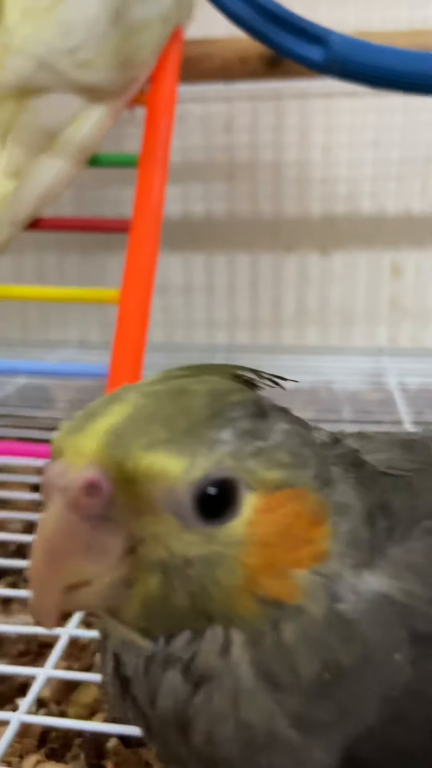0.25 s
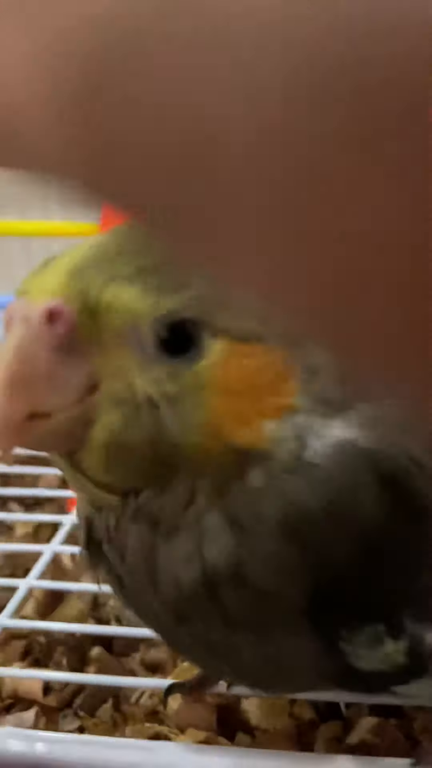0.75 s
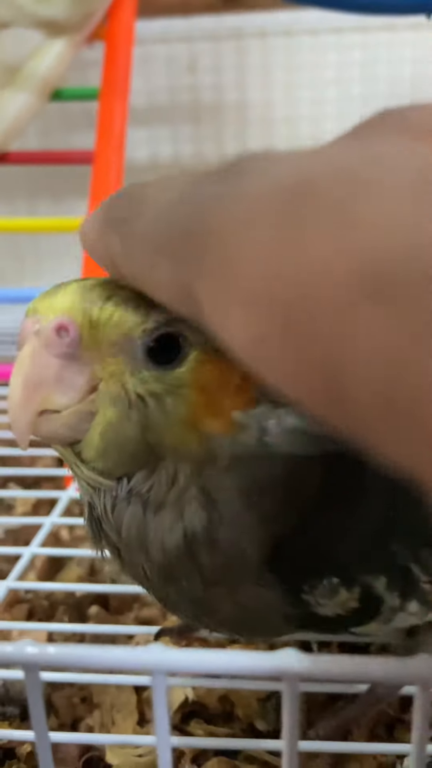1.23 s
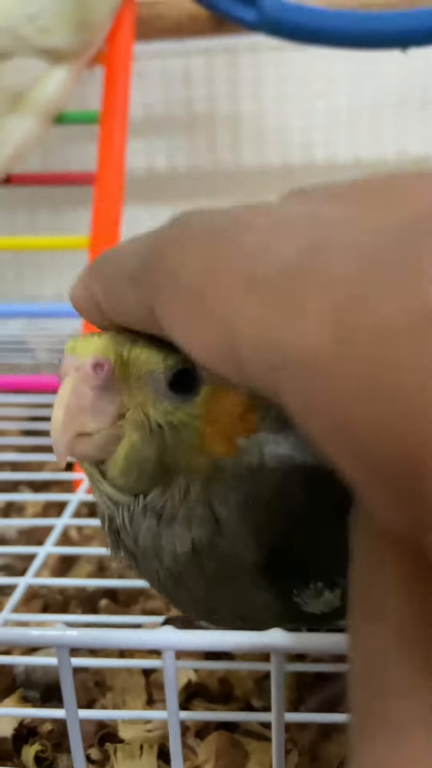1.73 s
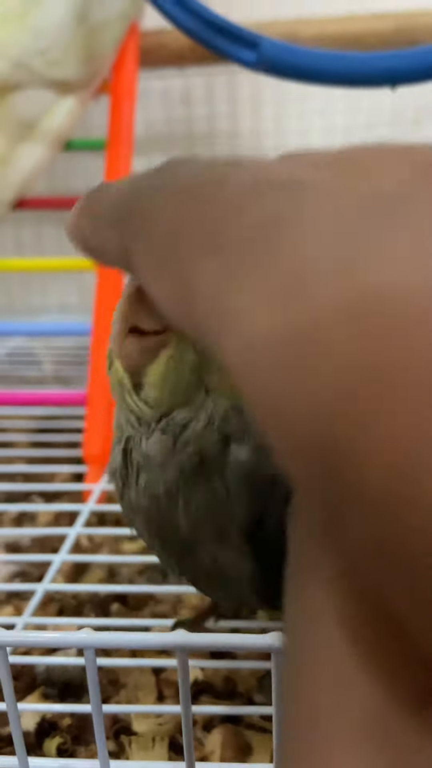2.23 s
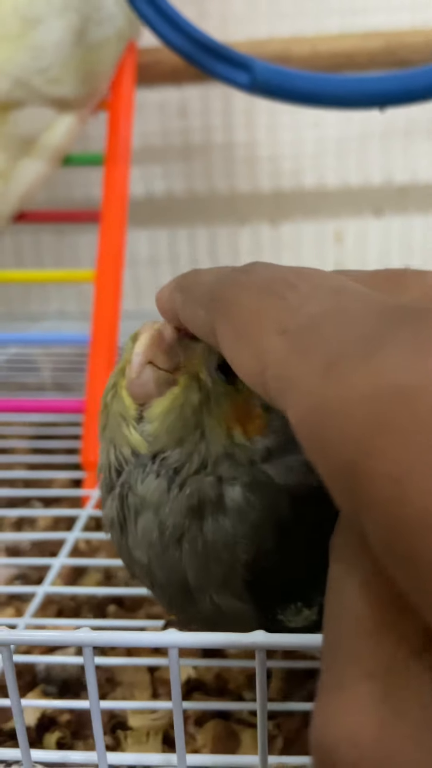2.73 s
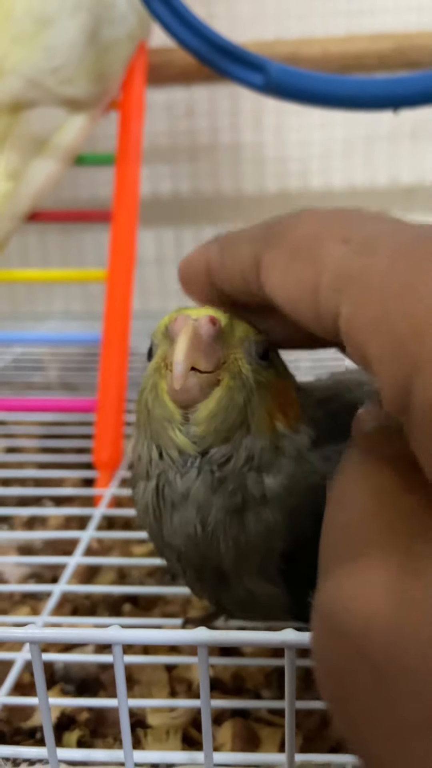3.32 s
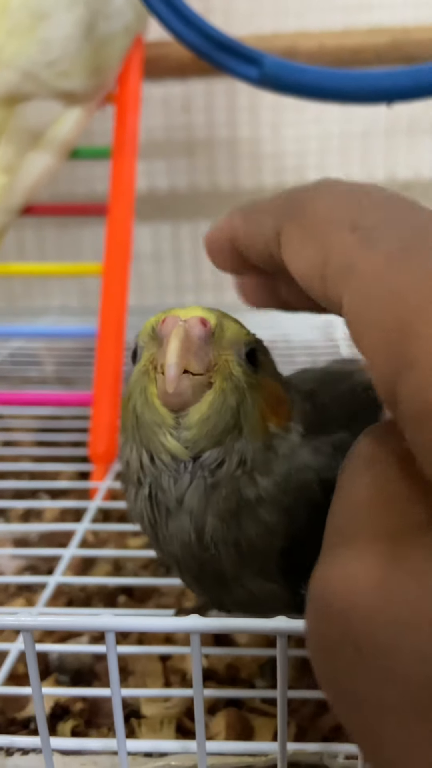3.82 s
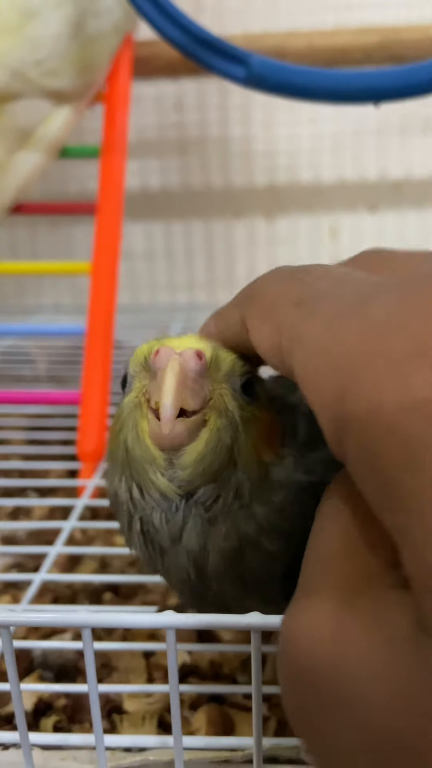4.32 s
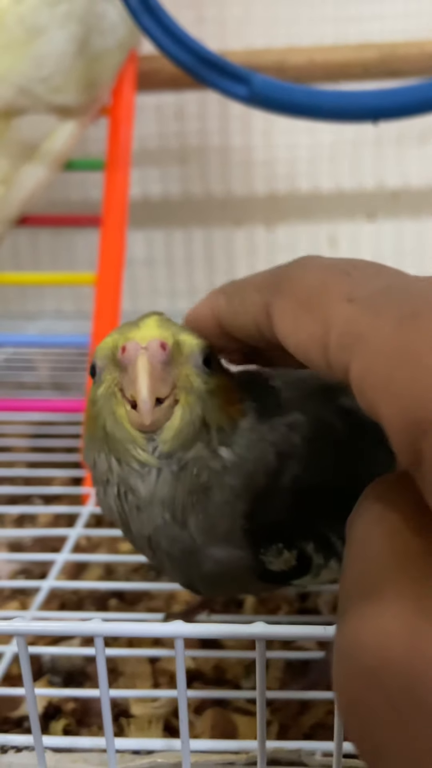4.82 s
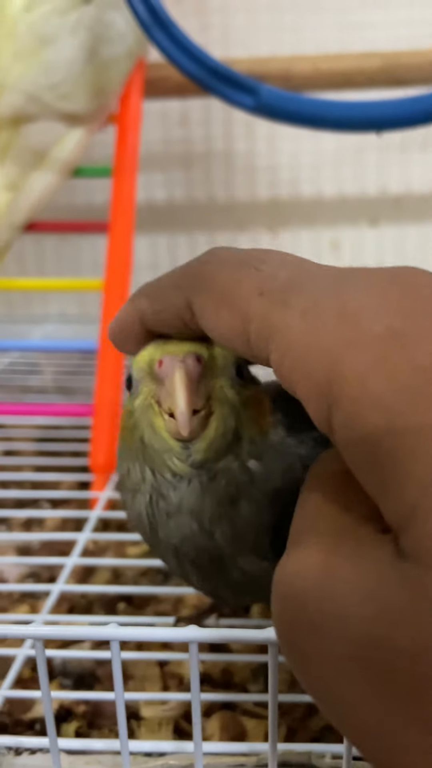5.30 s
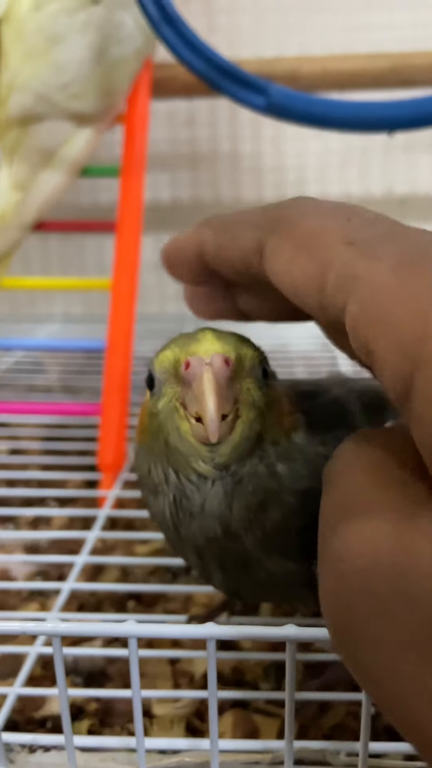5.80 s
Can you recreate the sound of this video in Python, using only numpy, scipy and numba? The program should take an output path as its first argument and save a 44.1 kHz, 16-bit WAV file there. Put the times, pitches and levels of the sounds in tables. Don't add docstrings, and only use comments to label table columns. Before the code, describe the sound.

A young cockatiel close to a phone microphone gives a short raspy hiss ending in a hard push and squeak, then clicks and weak little puffs with thin whistles. A longer hiss swells around two seconds, a quiet gap follows, then short puffs, a sharp squeak and a final hiss that grows loud and open. Low motor rumble and faint fan hum fill the small room.

```python
import sys
import numpy as np
from scipy import signal
from scipy.fft import rfft, irfft
from scipy.io import wavfile
from scipy.ndimage import uniform_filter1d
from numba import njit

SR = 44100
rng = np.random.default_rng(int(sys.argv[2]) if len(sys.argv) > 2 else 0)


def ratio_of_db(decibels):
    return 10 ** (np.asarray(decibels, float) / 20)


def to_wav(s):
    ch = np.atleast_2d(s).T
    pcm = np.round(np.clip(ch, -1, 1) * 32767)
    wavfile.write(sys.argv[1], SR, pcm.astype(np.int16))


N = 266849
T = np.arange(N) / SR

# f/Hz, density/dB per Hz
ROOM_AIR = [(28, -38), (45, -3.5), (70, -2.5), (150, -6.5), (450, -6.5), (900, -12), (1700, -20.5),
            (2800, -23), (4000, -29), (5100, -35), (6400, -28.5), (7500, -42.5), (11000, -51.5),
            (13500, -43.5), (14800, -62)]
# f/Hz, share/0-1
ROOM_LIKENESS = [(60, 1), (250, 1), (600, 0.35), (1200, 0), (4500, 0.35), (6000, 0), (7200, 0.68)]
# t/s, level/dB
TRAFFIC = [(0, -52.5), (.44, -53), (1.26, -53), (1.5, -50.5), (2.56, -53), (3.6, -52), (4.6, -50.5),
           (5.1, -46.5), (5.45, -52), (5.69, -51), (6.05, -53.5)]
# t/s, level over rest/dB
DRONE_SWELLS = [(0.0, 11.5), (.29, 11), (.83, 7.5), (1.26, 5), (2.17, 1), (3.62, 7), (5.05, 6.5),
                (5.51, 3.5), (6.05, 4)]
# f/Hz, waver/Hz, level/dB
FAN_TONES = [
    (279.5, 7.14, -63),
    (443.1, 3.87, -59),
    (12900, 8, -110),
]
# f/Hz, left lead/rad
PORT_LEAD = [(0, 0), (1900, .4), (3300, 1.), (4700, 0.), (6000, 1.8), (6900, 2.95), (8000, 3.35),
             (9500, 6.05), (11200, 6.5), (12700, 9.25), (14300, 9.7), (15700, 12.6)]
# f/Hz, left minus right/dB
PORT_BALANCE = [(100, 2), (2600, -0.5), (3600, -5), (4600, -10.5), (5500, 1), (16000, 3)]
# t/s, peak/dB, windpipe f/Hz
CLICKS = [(0.6555, -29, 1630), (0.9938, -34, 1600), (1.538, -35, 1870), (3.8056, -29, 1600),
          (3.9806, -43, 1630)]
# t/s, peak/dB, f/Hz, glide/Hz per ms, hold/ms
WHISTLES = [(.376, -35, 4040, -150, 1.2), (.3785, -30.5, 5660, -20, 1), (.3845, -27.5, 2600, -80, 2.3),
            (.4, -57, 2800, -0.5, 47), (.8235, -31, 2235, 53, 2.5), (1.011, -41.5, 1730, 4, 4),
            (1.153, -42, 5080, 51, 4), (1.16, -43, 5370, 1.5, 48), (1.220, -44, 5300, -15, 8.5),
            (1.238, -49, 4700, -48, 5.7), (1.245, -43, 4390, -150, 2), (1.2522, -25.5, 2226, -73.5, 1.75),
            (3.193, -55, 3400, 88, 6.2), (3.2, -41, 4020, 22, 5.8), (3.216, -56, 4040, -7, 18),
            (3.211, -60, 5370, -20, 1), (4.716, -28, 5790, 30, 1.2)]
# t/s, peak/dB, f/Hz, glide/Hz per ms, hold/ms
SQUEAKS = [(.381, -34.5, 2830, -45.5, 4.1), (.671, -51, 3130, 11, 2.3), (2.364, -35, 1960, -10, 1.8),
           (3.188, -55, 3000, 29, 2), (3.586, -24.5, 2341, 71, 2.9), (3.5905, -26.5, 2477, -80, 1.5),
           (3.848, -45.5, 1610, 5, 8.5), (4.717, -30, 2016, 10.5, 1.3)]
OVERTONE_DB = [
    0.5,
    -8,
    -15,
]
# t/s, effort/dB, beak opening/0-1, windpipe share/dB
HISSES = [
    [(0.0, -41.5, 0.14, -1), (0.06, -45, 0.13, -4.5), (0.252, -42.5, 0.05, -4.5), (0.36, -51, 0.23, -17),
     (0.378, -32, .9, -7.5)],
    [(1.484, -56, 0.16, 14.5), (1.55, -49, 0.12, -2.5), (1.724, -46.5, 0.15, -4), (1.914, -39.5, 0.14, 0),
     (2.07, -46, 0.14, -10), (2.128, -41, .1, -0.5), (2.145, -36.5, 0.07, -1.5), (2.212, -33.5, 0.11, -5.5),
     (2.368, -45, 0.28, -2.5)],
    [(3.836, -49, 0.08, -2), (3.862, -46, 0.19, -5.5), (4.082, -42.5, 0.5, -8), (4.3, -37.5, .7, -2.5),
     (4.452, -32, 1, -4.5), (4.5, -32.5, 0.9, 0), (4.52, -33.5, 1, -1), (4.66, -29.5, 1, -4.5),
     (4.719, -33.5, 1, -3)],
]
# start t/s, end t/s, effort/dB, windpipe share at start/dB, closing push/dB
PUFFS = [(0.676, 0.821, -50, 0, 9), (1.01, 1.088, -51.5, -1, 6.5), (1.11, 1.155, -47, -25, -8),
         (1.207, 1.258, -51.5, -25, 0.1), (3.229, 3.293, -51.5, -23, 2), (3.339, 3.585, -44.5, -10, 14)]
# t/s, length/ms
CATCHES = [(0.0135, 3.5), (0.0594, 5.5), (0.0698, 4), (0.0908, 10), (0.2948, 4), (0.3043, 3.5),
           (0.3163, 6.5), (0.3495, 6), (0.3602, 6), (0.7149, 4), (0.7268, 6.5), (0.8072, 6), (1.0222, 4.5),
           (1.0282, 6.5), (1.0666, 7.5), (1.519, 3.5), (1.5405, 5), (1.9446, 3), (1.996, 3), (3.3768, 12),
           (3.4936, 7), (3.942, 6), (3.975, 3), (3.982, 11), (4.0099, 6), (4.4813, 3), (4.4863, 8),
           (4.4973, 8), (4.6484, 6)]

ROOM_AIR_DB, DRONE_DB, SWELL_S = -48.5, -51, 0.12
ECHO_T60_S, ECHO_DB, NEAR_DB = 0.35, -17, 25
WHISTLE_OVERTONES_DB, SQUEAK_OVERTONES_DB = -15.5, -5.5
RISE_MS, FALL_MS, TOP_OVERTONE_HZ = 1.8, 2.1, 11150
CLEARING_DB_PER_MS = 3.9
PUFF_OPENING, PUFF_WINDPIPE_FADE_DB, CLOSING_S = 0.18, -1, 0.0098
CATCH_DB, CATCH_DB_PER_MS = -13, -1.5
STUTTERS_PER_S, STUTTER_MS = 5, 2
# f beak shut/Hz, rise wide open/Hz
WINDPIPE, THROAT, BEAK, AIR = (1575, 274), (3873, 1090), (5860, -100), (8800, 1400)
PULSES_PER_S, AIR_WIDTH_HZ, BEAK_DB = 410, 2100, -1.5
AIR_DB, AIR_LOSS_DB_PER_DB, AIR_KNEE_DB = -17.5, 1.5, -40


def rms1(x):
    return x / np.sqrt(np.mean(x ** 2))


def along(table, hz):
    f, v = np.transpose(table)
    return np.interp(np.log(hz + 1), np.log(f + 1), v)


@njit
def svf(x, hz, width_hz):
    y, band, low = np.empty(len(x)), 0., 0.
    for i in range(len(x)):
        g, k = np.tan(np.pi * hz[i] / SR), width_hz / hz[i]
        v = (band + g * (x[i] - low)) / (1 + g * (g + k))
        band, low, y[i] = 2 * v - band, low + 2 * g * v, k * v
    return y


def ring(x, hz, width_hz):
    hz = hz * np.ones(len(x))
    once = svf(x, hz, 1. * width_hz)
    return svf(once, hz, 1. * width_hz)


def notch(x, hz, width_hz):
    return x - svf(x, hz * np.ones(len(x)), 1. * width_hz)


def notch_twice(x, hz, width_hz):
    return notch(notch(x, hz, width_hz), hz, width_hz)


def walk(rate_hz):
    k = int(SR / rate_hz)
    held = np.repeat(rng.standard_normal(N // k + 1), k)[:N]
    return 0.557 * uniform_filter1d(uniform_filter1d(held, k), k)


def ports(x):
    hz = np.fft.rfftfreq(N, 1 / SR)
    half = ratio_of_db(along(PORT_BALANCE, hz) / 2) * np.exp(.5j * along(PORT_LEAD, hz))
    return irfft(rfft(x) * np.array([half, 1 / half]), N)


def boom(hz, width_hz):
    mid, side = (rms1(ring(rng.standard_normal(N), hz, width_hz)) for _ in range(2))
    side_db = np.maximum(-5 - 16 * T, -30)
    return mid + ratio_of_db(side_db) * side * np.array([[1], [-1]])


def room_air(traffic_db):
    hz = np.fft.rfftfreq(N, 1 / SR)
    share = np.clip(along(ROOM_LIKENESS, hz), 0, 1)
    lead = np.exp(.5j * along(PORT_LEAD, hz))
    common, left, right = rfft(rng.standard_normal((3, N)))
    both = np.sqrt(share) * common * np.array([lead, 1 / lead])
    both = both + np.sqrt(1 - share) * np.array([left, right])
    both = both * ratio_of_db(along(ROOM_AIR, hz))
    air = 0
    for octave in np.arange(4, 14.5, 1.):
        band = np.clip(1 - np.abs(np.log2(hz + 1) - octave), 0, 1)
        swell_db = (traffic_db - traffic_db.mean()) * np.clip((11.5 - octave) / 1.8, .2, 1)
        air = air + irfft(both * band, N) * ratio_of_db(swell_db + 3.54 * walk(4.653))
    return ratio_of_db(ROOM_AIR_DB) * rms1(air)


def motors(traffic_db):
    drone_db = DRONE_DB + sum(db * np.exp(-((T - s) / SWELL_S) ** 2) for s, db in DRONE_SWELLS)
    drone = ratio_of_db(drone_db + 1) * boom(59 * (1 + 0.04 * walk(0.74)), 21)
    overtones = boom(109.55, 11.7) + boom(157.3, 27.3)
    return drone + ratio_of_db(traffic_db - 4.5 + 3.2 * walk(3.81)) * overtones


def fan():
    out = np.zeros(N)
    for hz, waver_hz, db in FAN_TONES:
        turn = 2 * np.pi * np.cumsum(hz + waver_hz * walk(12)) / SR
        out += ratio_of_db(db + 5.7 * walk(6.7)) * rms1(np.sin(turn))
    return out


def room():
    traffic_db = np.interp(T, *np.transpose(TRAFFIC))
    return room_air(traffic_db) + motors(traffic_db) + ports(fan())


def echo(x):
    t = T[:SR // 3]
    tail = rng.standard_normal((2, len(t))) * np.minimum(t / 0.009, 1)
    walls = np.exp(-np.log(1000) * t / ECHO_T60_S)
    near = ratio_of_db(NEAR_DB) * np.exp(-t / 0.0034)
    tail = signal.lfilter([1], [1, -.55], tail * (walls + near))
    tail = tail / np.sqrt(np.sum(tail[0] ** 2))
    return ratio_of_db(ECHO_DB) * signal.fftconvolve(x[None], tail)[:, :N]


def clicks():
    out, t = np.zeros(N), T[:300]
    for s, db, hz in CLICKS:
        pop = 0
        for k in range(6):
            pop = pop + ratio_of_db(-5 * k) * np.sin(2 * np.pi * (k + 1) * hz * t) * np.exp(-t * (k + 2) / 0.0028)
        out[int(s * SR):][:300] += ratio_of_db(db) * pop * np.minimum(t / 0.00042, 1)
    return out


def squeaks():
    out, waver, flutter_db = np.zeros(N), walk(400), walk(900)
    for rows, over_db in ((WHISTLES, WHISTLE_OVERTONES_DB), (SQUEAKS, SQUEAK_OVERTONES_DB)):
        for s, db, pitch_hz, glide, hold_ms in rows:
            on = slice(int((s - .008) * SR), int((s + hold_ms / 1000 + .008) * SR))
            ms = (T[on] - s) * 1000
            before, after = np.maximum(-ms, 0), np.maximum(ms - hold_ms, 0)
            hz = pitch_hz + glide * (ms - after) - abs(glide) * after
            turn = 2 * np.pi * np.cumsum(hz * (1 + 0.017 * waver[on])) / SR
            overtones = 0
            for k, partial_db in enumerate(OVERTONE_DB):
                if (k + 2) * pitch_hz < TOP_OVERTONE_HZ:
                    overtones = overtones + ratio_of_db(partial_db + k * flutter_db[on]) * np.sin((k + 2) * turn)
            level = ratio_of_db(db - 6 * (before / RISE_MS) ** 2 - 6 * (after / FALL_MS) ** 2)
            reed = ratio_of_db(over_db + CLEARING_DB_PER_MS * (before - after)) * overtones
            out[on] += np.sqrt(2) * level * (np.sin(turn) + reed)
    return out


def syrinx(rate_hz, jitter=.28, size_db=1.5, puff_ms=.8, puff_db=0., leak_db=-2.5):
    gap_chance, size_chance = rng.standard_normal((2, N // 30))
    at = np.searchsorted(np.cumsum(rate_hz) / SR, np.cumsum(np.exp(jitter * gap_chance)))
    pulses = np.bincount(at, ratio_of_db(size_db * size_chance), N + 1)[:N]
    puff = signal.lfilter([1], [1, -np.exp(-1000 / (puff_ms * SR))], pulses)
    air = rng.standard_normal(N) * (ratio_of_db(puff_db) * rms1(puff) + ratio_of_db(leak_db))
    return rms1(rms1(pulses) + air)


def breath_controls():
    short = []
    for s, end, db, pipe_db, push_db in PUFFS:
        faded_db = pipe_db + PUFF_WINDPIPE_FADE_DB
        short.append([(s, db, PUFF_OPENING, pipe_db), (end - CLOSING_S, db, PUFF_OPENING, faded_db),
                      (end, db + push_db, PUFF_OPENING, faded_db)])
    calls = sorted(HISSES + short)
    s, *columns = np.transpose(np.concatenate(calls))
    flow = sum((T >= call[0][0]) & (T < call[-1][0]) for call in calls) * 1.
    stutters = [(at, STUTTER_MS) for at in rng.random(STUTTERS_PER_S * N // SR) * (N / SR)]
    for start, ms in CATCHES + stutters:
        flow[int(start * SR):int((start + ms / 1000) * SR)] *= ratio_of_db(CATCH_DB + CATCH_DB_PER_MS * ms)
    return (flow, *(np.interp(T, s, c) for c in columns))


def hisses():
    flow, level_db, opening, pipe_db = breath_controls()
    pipe, throat, beak, air = (shut + wide * opening for shut, wide in (WINDPIPE, THROAT, BEAK, AIR))
    air_db = AIR_DB - AIR_LOSS_DB_PER_DB * np.maximum(level_db - AIR_KNEE_DB, 0)
    source = syrinx(np.full(N, PULSES_PER_S)) * ratio_of_db(0.5 * walk(46)) * uniform_filter1d(flow, size=40)
    low = rms1(ring(source, pipe, 850) - ratio_of_db(-5) * ring(source, 2400, 600))
    chest_db = -46.5 + (level_db + 31) / 2 - (throat - 4100) / 90
    chest = ratio_of_db(chest_db) * rms1(ring(source, 1168, 930))
    high = ring(source, air, AIR_WIDTH_HZ) + ratio_of_db(-5) * ring(source, 1.64 * air, 2200)
    high = high + ratio_of_db(-26) * ring(source, 6560, 1070)
    fill_db = level_db + air_db - 3 - (throat - 4100) / 18
    fill = ratio_of_db(fill_db) * rms1(ring(source, 1.4 * air, 2900))
    under = ratio_of_db(-14 + (throat - 4900) / 60) * rms1(ring(source, 3230, 1400))
    edge = ratio_of_db(-79 + 2 * (level_db + 40)) * rms1(ring(source, 14860, 700))
    tube = rms1(ring(source, throat, 1450)) - ratio_of_db(BEAK_DB) * rms1(ring(source, beak, 1700))
    voice = tube - under + ratio_of_db(pipe_db) * low + ratio_of_db(air_db + 9) * rms1(high)
    rasp = ratio_of_db(level_db - 1.5) * voice + chest
    rasp = notch_twice(rasp, 1.356 * air, 2050) + fill
    rasp = notch_twice(rasp, 15500, 2000) + edge
    rasp = notch(rasp, 7350, 1600)
    shut = np.clip((4900 - throat) / 700, .3, 1)
    return (shut * notch(rasp, 2860, 250) + (1 - shut) * rasp) * np.sqrt(flow.mean())


def scene():
    bird = hisses() + squeaks() + clicks()
    return ports(bird) + echo(bird) + room()


def low_pass(x):
    return signal.sosfilt(signal.butter(12, 16790, fs=SR, output="sos"), x)


def record(dry):
    top = signal.ellip(8, .2, 70, 15800, fs=SR, output="sos")
    bass = signal.butter(2, 50, "high", fs=SR, output="sos")
    mix = signal.sosfilt(np.vstack([top, bass]), dry)
    return low_pass(mix)


dry = scene()
out = record(dry)
to_wav(out)
```